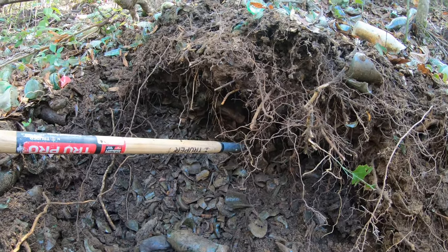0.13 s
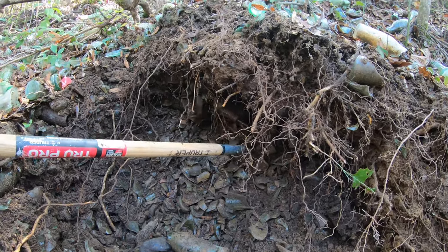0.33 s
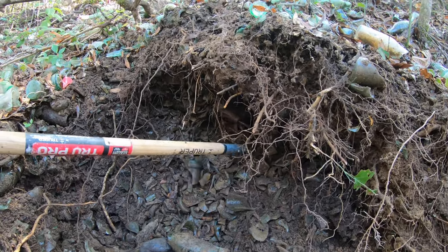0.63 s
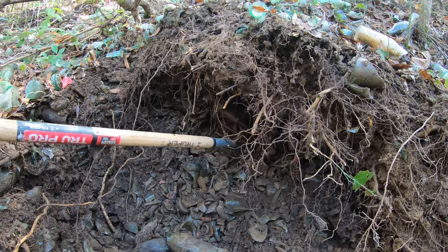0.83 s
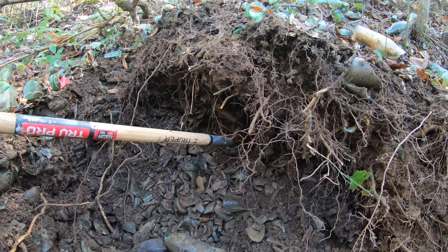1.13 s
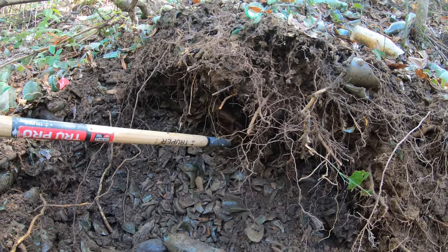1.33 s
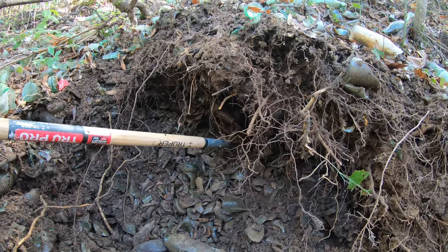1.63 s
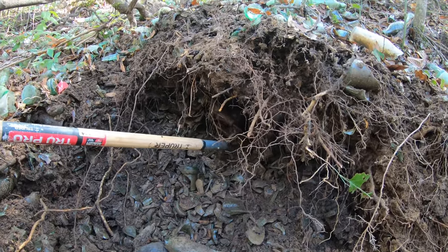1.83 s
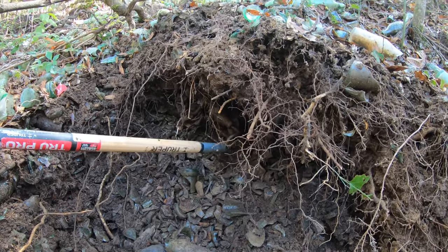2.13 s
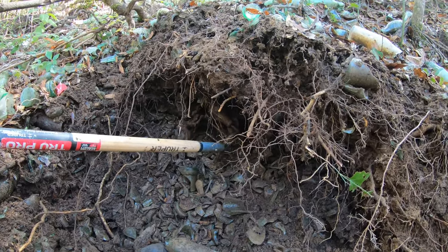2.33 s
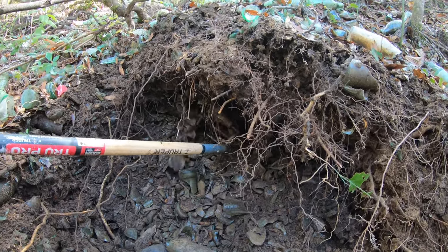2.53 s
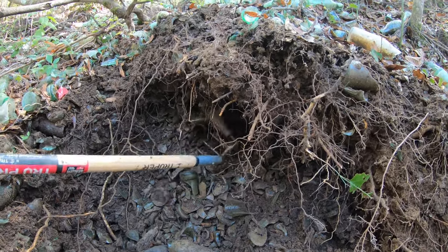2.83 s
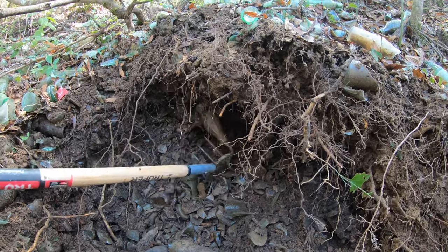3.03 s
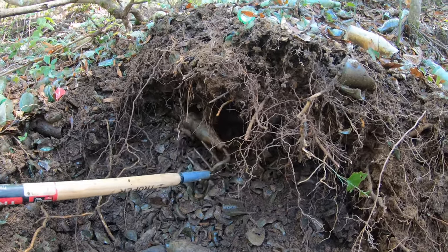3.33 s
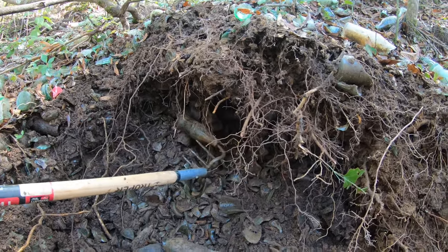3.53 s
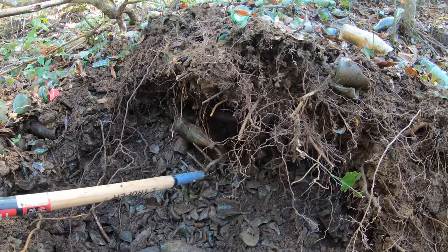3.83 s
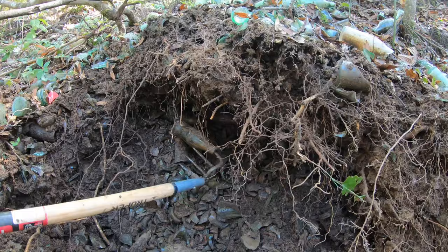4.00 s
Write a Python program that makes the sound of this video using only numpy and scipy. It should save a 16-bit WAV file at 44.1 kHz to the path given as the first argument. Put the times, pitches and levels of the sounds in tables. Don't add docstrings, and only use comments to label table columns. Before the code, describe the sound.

Close up outdoors, a long-handled steel claw works through soil packed with broken glass. Loose grit trickles, then tines bite in short uneven strokes: crunching scrapes, snapping chips, hard clinks and tiny steel pings. Activity is busy in the first second, sparser around one and a half, then dense again from two to four seconds. Dull clod and handle thuds sit underneath, with faint far traffic behind. The stereo camera microphone sounds dry, without echo.

```python
import sys
import numpy as np
from scipy import signal
from scipy.io import wavfile
from scipy.ndimage import uniform_filter1d

SR = 44100
rng = np.random.default_rng(int(sys.argv[2]) if len(sys.argv) > 2 else 0)


def unload_audio(sound):
    columns = np.transpose(np.atleast_2d(sound))
    steps = np.round(np.clip(columns, -1, 1) * 32767)
    wavfile.write(sys.argv[1], SR, steps.astype(np.int16))


def to_linear_factor(level_db):
    exponent = np.asarray(level_db, float) / 20
    return 10 ** exponent


N = 183676


def evened(x):
    return x / np.sqrt(np.mean(x ** 2) + 1e-20)


def read(points, hz):
    f, value = np.transpose(points)
    return np.interp(np.log(hz + 1), np.log(f + 1), value)


def add(mix, s, sound):
    part = mix[round(s * SR):][:len(sound)]
    part += sound[:len(part)]


def band(x, low_hz, high_hz):
    sos = signal.butter(2, [low_hz, min(high_hz, .49 * SR)], "band", fs=SR, output="sos")
    return signal.sosfilt(sos, x)


def wander(per_s):
    sos = signal.butter(1, per_s, fs=SR, output="sos")
    return evened(signal.sosfilt(sos, rng.standard_normal(N)))


def resonate(x, hz, width_hz):
    r = np.exp(-np.pi * width_hz / SR)
    pole = r * np.exp(2j * np.pi * hz / SR)
    return 2 * signal.lfilter([1 - r], [1, -pole], x).real


# f/Hz, level/dB per Hz
AIR_SPECTRUM = [(20, 1), (76, 10.5), (527, -20), (754, -12), (1940, -25.5), (4070, -76), (7000, -55),
                (11000, -58.5), (15000, -46)]
AIR_DB = -45


def air():
    frames, hz = N // 512 + 6, np.fft.rfftfreq(2048, 1 / SR)
    a, b, c, d, patches = rng.standard_normal((frames, 1025, 5)).T
    patches = evened(uniform_filter1d(uniform_filter1d(patches, 5, 0), 8, 1))
    shape = to_linear_factor(read(AIR_SPECTRUM, hz)[:, None] + 3 * patches)
    mid = (a + 1j * b) * shape
    side = to_linear_factor(-9.5) * (c + 1j * d) * shape
    ports = np.array([mid + side, mid - side])
    wash = signal.istft(ports, nperseg=2048, noverlap=1536)[1][:, :N]
    return to_linear_factor(AIR_DB) * evened(wash)


def drone(s, hz, db, waver_hz):
    clock = np.arange(N) / SR
    turns = np.cumsum(np.interp(clock, s, hz) + waver_hz * wander(per_s=7.6)) / SR
    level_db = np.interp(clock, s, db) + 1.94 * wander(per_s=8.76)
    return np.sqrt(2) * to_linear_factor(level_db) * np.sin(2 * np.pi * turns)


# t/s, f/Hz, level/dB rms
ENGINES = [
    [(0, 66, -41), (.45, 67.52, -32), (.9, 68.8, -34.5), (1.15, 73.25, -40), (1.32, 74.5, -35),
     (1.7, 77.87, -44), (2, 77.63, -41.5), (2.1, 79, -59), (2.2, 79.3, -45.5), (2.4, 75.9, -61),
     (2.6, 75.9, -51), (2.9, 76.3, -49.5), (3, 75, -80.5)],
    [(3.25, 56, -69), (3.5, 55.3, -43), (3.8, 55.65, -38.5), (3.92, 57.64, -29.5), (4.16, 58.9, -30)],
]
# t/s, level/dB rms
HUM = [(0, -52.5), (.7, -63), (.9, -44.5), (1.15, -51), (1.45, -80), (1.6, -55), (1.9, -65), (2.1, -50),
       (2.8, -48), (3.6, -69), (3.9, -50.5), (4.16, -55)]
HUM_HZ = 151.6


def far_machines():
    s, db = np.transpose(HUM)
    hum = drone(s, HUM_HZ + 0 * s, db, waver_hz=1.4)
    return hum + sum(drone(*np.transpose(engine), waver_hz=1.0) for engine in ENGINES)


def grains(low_hz, high_hz, cycles, per_s):
    t, layer = np.arange(640) / SR, np.zeros(N)
    size = to_linear_factor(3.1 * np.minimum(rng.exponential(1, N), 3.1)) * (rng.random(N) < per_s / SR)
    size *= rng.choice([-1., 1.], N)
    kind = rng.integers(0, 14, N)
    for k, hz in enumerate(np.geomspace(low_hz, high_hz, num=14)):
        ring = cycles * (.6 + (k % 3) ** 2 / 2)
        decay = np.exp(-t * hz * np.pi / ring) * (1 - t / t[-1])
        grain = np.sin(2 * np.pi * hz * t) * decay * np.sqrt(hz / ring)
        layer += signal.oaconvolve(size * (kind == k), grain)[:N]
    return layer


SNAGS_PER_S, SNAG_S, SNAG_SIZE = 60, .003, .5
CHIP_SNAG = 1.21


def snags():
    size = SNAG_SIZE * np.minimum(rng.exponential(1, N), 2) * (rng.random(N) < SNAGS_PER_S / SR)
    breaks = [*CHIPS_EARLY, *CHIPS_LATE, *TICKS, *CLINKS]
    s, db = np.transpose([row[:2] for row in breaks])
    size[np.round(SR * s).astype(int)] += CHIP_SNAG * to_linear_factor((db + 16.5) / 3)
    pull = signal.lfilter([1], [1, -np.exp(-1 / (SNAG_S * SR))], size)
    return evened(1 + 3 * np.tanh(pull / 3))


# lowest f/Hz, highest f/Hz, ring/cycles, rate/(1/s)
GRAINS = [
    (1555, 4410, 8.7, 2400),
    (4770, 15200, 9.07, 3600),
    (700, 1336, 15, 900),
    (201, 285, 5.5, 440),
]
# t/s, level/dB
TRICKLE = [(0, -39.5), (0.042, -61), (.16, -54), (.22, -52), (.55, -42), (.75, -69), (1.25, -48),
           (1.42, -61.5), (1.549, -56.5), (1.63, -65.5), (1.73, -60), (1.8, -55), (2.4, -56.5),
           (3.101, -51), (3.32, -50.5), (3.9, -59.5), (4.16, -65)]
# start t/s, length/s, level/dB, singing f/Hz
SLIPS = [(0.068, 0.036, -44.5, 2020), (0.455, 0.034, -39, 1830), (0.939, 0.0066, -38, 6400),
         (0.988, 0.075, -44.5, 2200), (1.09, 0.038, -40, 2610), (1.153, 0.015, -30.5, 1970),
         (1.249, 0.034, -44, 2040), (1.344, 0.017, -51, 3040), (1.649, 0.02, -49, 3860),
         (1.864, 0.0161, -34.5, 1960), (2.566, 0.019, -36.5, 3140), (2.972, 0.026, -36.5, 2880),
         (3.364, 0.0428, -34.5, 3100), (3.524, 0.0292, -49, 4070), (3.564, 0.0323, -50, 4260),
         (4.036, 0.14, -61, 3090), (4.124, 0.0131, -46, 2940)]
# start t/s, length/s, level/dB, singing f/Hz, pebble
# level/dB
SLIPS_OWN_PEBBLES = [(0.236, 0.0548, -37, 2850, -5.5), (0.329, 0.064, -51.5, 1560, 6), (0.482, 0.043, -33, 4560, -15),
                     (0.558, 0.15, -36.5, 3850, -17), (0.773, 0.14, -37, 2460, -10.5), (1.484, .12, -53, 1780, -19),
                     (1.777, 0.1, -46.5, 1940, -10), (1.916, 0.0726, -47, 1700, -4), (2.083, 0.092, -35, 6450, -6),
                     (2.199, 0.103, -41.5, 1923, -5.5), (2.303, 0.093, -48.5, 3960, -8),
                     (2.381, 0.056, -35, 3400, -9.5), (2.468, 0.067, -41, 3660, -27), (2.643, 0.22, -33, 3340, -10),
                     (2.854, 0.073, -66, 3280, 4), (3.006, 0.0965, -42.5, 2740, -5), (3.114, 0.098, -42.5, 7550, -10.5),
                     (3.211, 0.098, -45.5, 2950, -7.5), (3.418, 0.044, -40, 3340, 0.5), (3.601, 0.057, -41, 4460, -3),
                     (3.671, 0.033, -34.5, 4670, -9), (3.704, 0.064, -42, 4940, -31), (3.773, 0.05, -39.5, 3470, -38),
                     (3.832, 0.19, -43.5, 3070, -8)]
SLIP_PEBBLES_DB = -13
GLASS_HZ = 3400
SAND_DB, SAND_DB_PER_OCTAVE = -4.5, 1.5
SAND_DB_PER_S = 1.5
SONG_DB, SONG_WIDTH = -14, .17


def grind():
    chatter_db, catch = 1.5 * wander(per_s=70), snags()
    layers = []
    for kind in GRAINS:
        level_db = chatter_db + 2.0 * wander(per_s=12.3)
        layers.append(evened(grains(*kind) * catch * to_linear_factor(level_db)))
    grit, sand, pebbles, clods = layers
    s, trickle_db = np.transpose(TRICKLE)
    soil = grit + to_linear_factor(-2.0) * sand + to_linear_factor(-15.0) * pebbles
    out = to_linear_factor(np.interp(np.arange(N) / SR, s, trickle_db)) * soil
    for s, length, db, hz, pebble_db in [*SLIPS_OWN_PEBBLES, *[(*row, SLIP_PEBBLES_DB) for row in SLIPS]]:
        sand_db = SAND_DB + SAND_DB_PER_OCTAVE * np.log2(hz / GLASS_HZ)
        sand_db += SAND_DB_PER_S * (s - N / SR / 2)
        start = max(s - length / 2, 0)
        part = slice(round(start * SR), round((start + 2 * length) * SR))
        clock = start + np.arange(len(grit[part])) / SR
        place = 2 * (clock - s) / length - 1
        song = evened(resonate(grit[part] + sand[part], hz, width_hz=SONG_WIDTH * hz))
        crush = to_linear_factor(-3) * grit[part] + to_linear_factor(sand_db) * sand[part]
        crush += to_linear_factor(SONG_DB - .45 * sand_db) * song
        crush += to_linear_factor(pebble_db) * (pebbles[part] + to_linear_factor(-3) * clods[part])
        fall = abs(place) ** np.where(place < 0, 3.5, 2.2)
        out[part] += crush * to_linear_factor(db - 8.85 * fall)
    return out + squeals(grit + sand)


# t/s, peak level/dB, f/Hz
CHIPS_EARLY = [(0.095, -26, 2060), (0.2287, -21, 3740), (0.283, -19, 1857), (0.3007, -28, 5100),
               (0.3372, -22.5, 5910), (0.497, -20, 1900), (0.4372, -21, 3080), (0.47, -33.5, 4630),
               (0.519, -20, 3200), (0.654, -28, 6100), (0.5756, -20, 2150), (0.6027, -27.5, 4310),
               (0.6126, -19, 5990), (0.7041, -28.8, 1900), (0.7231, -23, 3790), (0.681, -24, 6000),
               (0.795, -30, 2564), (0.8191, -32.5, 2450), (0.853, -27, 2400), (0.833, -47, 2300),
               (0.847, -29, 2690), (0.8695, -14.5, 2060), (0.886, -19.5, 1920), (0.9017, -21, 3000),
               (0.9037, -20, 2540), (1.0286, -30.2, 3100), (1.0373, -26, 2020), (1.0907, -27, 2450),
               (1.1024, -27, 1210), (1.117, -23, 2710), (1.1274, -19.5, 2580), (1.1345, -31.3, 2610),
               (1.1644, -20, 3050), (1.3007, -25, 2800), (1.5256, -29, 1910), (1.561, -29, 4100),
               (1.5981, -27.5, 1850), (1.6449, -35.5, 4628), (1.7505, -27, 4300), (1.7636, -29, 2270),
               (1.8382, -27.5, 1690), (1.857, -21, 1972), (1.8983, -34, 2580), (1.869, -28, 6000),
               (1.9264, -28.5, 2980), (1.9315, -28, 4610), (1.964, -27, 5750), (2.0027, -31, 3700),
               (2.0841, -19, 2070), (2.117, -18, 4030), (2.1237, -31, 5880), (2.133, -33, 6610),
               (2.1363, -18, 3100), (2.105, -25, 6600)]
# t/s, peak level/dB, f/Hz
CHIPS_LATE = [(2.484, -21, 6300), (2.2513, -26, 1950), (2.3306, -23, 6000), (2.3539, -26, 6270),
              (2.3924, -24.5, 6930), (2.419, -19, 2020), (2.432, -26, 3150), (2.471, -23.5, 7530),
              (2.5, -22, 3324), (2.503, -31, 2240), (2.5139, -31, 3570), (2.538, -27, 2990),
              (2.5695, -31.5, 2750), (2.497, -19.5, 6600), (2.766, -36, 2010), (2.633, -19, 6100),
              (2.6521, -18.5, 1870), (2.658, -19, 3510), (2.677, -27, 2630), (2.6923, -27, 3680),
              (2.7402, -29, 5000), (2.8209, -17.5, 2100), (2.681, -26, 3000), (2.852, -27, 2280),
              (2.8836, -37, 4010), (2.892, -18, 6540), (2.9333, -23, 4370), (2.9554, -24.5, 3300),
              (2.9754, -21, 2670), (2.988, -21.4, 2794), (3.064, -19, 3290), (3.102, -26.5, 7580),
              (3.1584, -25.1, 2650), (3.162, -27, 3470), (3.2145, -25, 2234), (3.244, -34, 2730),
              (3.2593, -36, 2950), (3.285, -21.5, 2700), (3.256, -26, 9800), (3.377, -15, 2990),
              (3.4906, -25, 4150), (3.5435, -26, 3400), (3.5472, -26, 4260), (3.577, -24, 4390),
              (3.584, -21, 4220), (3.5952, -27, 4400), (3.6094, -28.5, 5230), (3.6447, -32, 5080),
              (3.698, -20.5, 4390), (3.7101, -24, 5900), (3.746, -23, 3630), (3.7775, -31, 3230),
              (3.676, -26, 3200), (3.8964, -23, 3080), (3.9152, -26, 3420), (3.974, -44, 3510),
              (3.9916, -24, 3350), (4.0163, -23.5, 3540), (4.0583, -33.5, 2940), (4.088, -32.5, 3400)]
CHIP_CYCLES, CHIP_CLICK_DB, CHIP_DB = 10.3, -3.5, -4.5


def chips():
    out, t = np.zeros(N), np.arange(512) / SR
    click = band(1. * (t == 0), 1500, 7700)
    click = click / abs(click).max()
    for s, db, hz in [*CHIPS_EARLY, *CHIPS_LATE]:
        ring = np.sin(2 * np.pi * hz * t) * np.exp(-t * hz * np.pi / CHIP_CYCLES)
        add(out, s, to_linear_factor(db + CHIP_DB) * (ring + to_linear_factor(CHIP_CLICK_DB) * click))
    return out


# t/s, peak level/dB, f/Hz
TICKS = [(0.143, -23.5, 2860), (0.173, -17.5, 4050), (0.1996, -14, 3420), (0.333, -20.5, 2690),
         (0.4112, -15.5, 2400), (0.43, -13.5, 3300), (0.526, -15, 4400), (1.216, -14.5, 2700),
         (4.16, -17, 3164), (1.3215, -17.5, 3520), (1.569, -21.5, 3980), (1.6862, -22.5, 3500),
         (1.7407, -23, 4300), (1.9517, -20.5, 2500), (2.043, -21.5, 3350), (2.1647, -14.5, 2920),
         (2.358, -17, 3352), (2.4922, -15, 4320), (2.9006, -16.5, 5700), (3.0252, -16, 2900),
         (3.129, -13, 3720), (3.1969, -18.5, 4830), (3.331, -19.5, 5460), (3.5548, -16, 2660),
         (3.617, -20, 2900), (3.728, -9.5, 3400), (3.8491, -15.5, 4000), (3.881, -27, 3090),
         (3.9434, -17.5, 3900), (4.13, -40, 3400)]
# t/s, ring level/dB, ring f/Hz, T60/s
PINGS = [(0.1727, -32.5, 7460, 0.036), (0.411, -46, 7400, .036), (0.6876, -21, 7434, 0.035),
         (.7601, -40, 7300, 0.036), (2.621, -25.5, 7640, .012), (2.973, -31.5, 7550, 0.034),
         (3.059, -35, 7550, .04), (3.098, -18, 7530, 0.041), (3.136, -16.5, 7585, 0.0423),
         (3.1395, -37, 7750, .015), (3.8043, -18, 7500, 0.017), (3.942, -33, 7430, 0.024)]
# t/s, peak level/dB, f/Hz, ring level re peak/dB
BLOWS = [(0.374, -16.5, 3200, -8), (0.4327, -12.5, 4700, -21), (.4893, -8, 4500, -3.5),
         (.5549, -9, 2480, -15.5), (.5718, -0.5, 3530, -16), (.582, -14.5, 4640, -20),
         (0.626, -4.5, 6200, -1.5), (0.646, -15, 6130, 1.5), (.719, -11.5, 4800, -26),
         (0.9355, -10.5, 5350, -33), (0.9392, -10, 5500, -30), (1.1484, -9, 2210, -6),
         (1.1585, -4, 4200, -13), (1.2273, -17, 3400, -7.5), (2.2229, -14, 2380, 0.5),
         (2.3995, -11, 3400, -14), (2.428, -10, 2830, -20), (2.4789, -6.5, 4600, -35.5),
         (2.585, -4, 4240, -7), (2.6194, -10.5, 2730, -32.5), (2.672, -13.5, 2665, -26),
         (2.834, -4.5, 3656, -0.5), (2.952, -7.5, 3550, 0), (3.0596, -8.5, 3810, -9),
         (3.099, -1.5, 3790, -28), (3.429, -13, 4900, -32), (3.4464, -12, 2290, 2), (3.58, -4.5, 3600, 1.5),
         (3.6826, -10, 4400, -15), (3.733, -4.5, 3610, -33)]
# t/s, ring level/dB, ring f/Hz, T60/s
CLINKS = [(0.434, -22, 3150, 0.02), (0.593, -21, 3960, .012), (.631, -19.5, 2430, 0.0089),
          (0.6677, -9, 3605, 0.035), (0.6798, -15.5, 3510, 0.018), (0.855, -26, 2650, 0.035),
          (1.009, -26.5, 1986, 0.014), (1.4926, -27.5, 5450, 0.00202), (1.5083, -26, 1060, 0.0066),
          (1.798, -33.5, 1210, 0.015), (1.8169, -25.5, 1970, 0.013), (1.8312, -25, 1220, 0.0089),
          (1.846, -20.5, 3280, 0.0074), (1.8722, -17.5, 1928, 0.022), (2.0769, -15.5, 2090, 0.00466),
          (2.244, -21.5, 990, 0.0106), (2.715, -17, 5146, 0.0077), (2.782, -14, 2060, 0.012),
          (2.9851, -16, 2840, 0.014), (3.087, -24, 2080, 0.0215), (3.118, -17.5, 3050, 0.0092),
          (3.1235, -17, 3780, 0.0054), (3.367, -16.5, 2906, 0.011), (3.3815, -33, 1920, .03),
          (3.4774, -11.5, 3104, 0.00386), (3.626, -18.5, 2920, 0.0048), (3.641, -21, 5150, 0.014),
          (3.6721, -16, 3380, 0.0054), (4.0028, -26.5, 3860, 0.0074), (4.0127, -27, 3665, 0.0093)]
BLOW_T60, TICK_T60 = 0.00498, 0.0031
TICK_RING_DB, CLINK_RING_DB, PING_RING_DB = -13, 1, -12
GLASS_PULL = 0.48


def strike_rows():
    rows = [(s, db, hz, hz, ring_db, BLOW_T60) for s, db, hz, ring_db in BLOWS]
    rows += [(s, db, hz, hz, TICK_RING_DB, TICK_T60) for s, db, hz in TICKS]
    for s, db, hz, t60 in CLINKS:
        crack_hz = hz * (GLASS_HZ / hz) ** GLASS_PULL
        rows.append((s, db - CLINK_RING_DB, crack_hz, hz, CLINK_RING_DB, t60))
    for s, db, hz, t60 in PINGS:
        rows.append((s, db - PING_RING_DB, 1.5 * hz, hz, PING_RING_DB, t60))
    return rows


def strikes():
    out, t = np.zeros(N), np.arange(3072) / SR
    for s, db, crack_hz, ring_hz, ring_db, t60 in strike_rows():
        noise = rng.standard_normal(len(t))
        snap = (noise + 8.8 * (t == 0)) * to_linear_factor(-60 * t / 0.014)
        crack = band(snap, crack_hz / 2.0, crack_hz * 1.662)
        crack = crack + to_linear_factor(-15.0) * band(snap, 1120, 10300)
        crumbs = to_linear_factor(-14) * noise * to_linear_factor(-60 * t / 0.015)
        crack = crack / abs(crack).max() + crumbs
        envelope = to_linear_factor(-60 * t / max(t60, .002)) * (1 - np.exp(-t / 0.000093))
        ring = np.sin(2 * np.pi * ring_hz * t) * envelope
        add(out, s, to_linear_factor(db - 5.0) * (crack + to_linear_factor(ring_db + 4.0) * ring))
    return out


# start t/s, length/s, level/dB, f/Hz, bandwidth/Hz
SQUEALS = [(0.255, 0.026, -34, 1870, 250), (0.461, 0.074, -34.5, 1840, 240),
           (0.773, 0.13, -37.5, 2473, 610), (0.978, .016, -46.5, 5640, 2500),
           (1.006, 0.0295, -45.5, 1984, 300), (1.114, 0.034, -44, 2800, 350),
           (2.098, 0.069, -43, 6600, 800), (2.13, 0.03, -39, 4450, 500), (2.254, 0.0294, -43, 1954, 250),
           (2.385, 0.034, -44, 6900, 600), (2.654, 0.0544, -37.5, 2550, 497),
           (3.247, 0.033, -39.5, 9660, 700)]


def squeals(grit):
    out = np.zeros(N)
    for s, length, db, hz, width_hz in SQUEALS:
        rub = grit[round(s * SR):][:round(length * SR)]
        tone = evened(resonate(resonate(rub, hz, width_hz), hz, 2 * width_hz))
        add(out, s, to_linear_factor(db) * tone * np.sqrt(np.hanning(len(rub))))
    return out


# t/s, peak level/dB, f/Hz
KNOCKS = [(0.373, -25, 1030), (0.396, -27, 794), (0.553, -28.5, 1120), (0.569, -40, 1160),
          (0.887, -31, 705), (0.948, -33.5, 1010), (1.215, -52, 1140), (1.947, -42, 910), (2.62, -36, 1153),
          (2.707, -34, 1160), (2.986, -34, 1060), (3.444, -27, 1260)]
KNOCK_T60 = 0.012
STRUCK_S = [.373, 1.1587, 2.122, 2.14, 2.241, 2.255, 2.782, 2.8336, 2.9523, 3.0985, 3.4464, 3.5803, 3.733]
# peak level/dB, f/Hz, T60/s
STRUCK_MODES = [
    [(-27, 7300, 0.0134)],
    [(-13.5, 9620, .011), (-17, 11400, 0.0057)],
    [(-30, 920, 0.026)],
    [(-30, 218, 0.0905)],
    [(-26, 6680, .006)],
    [(-35.5, 310, 0.053)],
    [(-31, 3000, 0.00787), (-39, 3750, .009)],
    [(-17.5, 1930, 0.0087), (-41, 4320, 0.017)],
    [(-9, 9057, 0.017), (-19.5, 4900, 0.0104), (-22, 4350, 0.019), (-19.5, 3270, 0.0167),
     (-21, 6570, 0.0046)],
    [(-13.5, 3050, 0.0108), (-15.5, 2290, 0.013), (-37, 13600, 0.026), (-18, 4700, .006)],
    [(-30.5, 3940, 0.0077), (-27, 1400, 0.0069)],
    [(-23.5, 4170, 0.051), (-20.5, 9100, 0.0045), (-18.5, 2840, 0.015), (-35, 2700, 0.012),
     (-40.5, 6500, 0.015)],
    [(-16, 1970, 0.0167), (-22.5, 1520, 0.022), (-24.5, 2700, .012), (-22, 5025, 0.011), (-34, 5150, .012),
     (-27, 7600, .007), (-28, 907, 0.028)],
]
# t/s, peak level/dB, f/Hz, T60/s
THUDS = [(0.491, -28.5, 263, 0.046), (0.555, -25, 261, 0.022), (1.508, -40.5, 183, 0.097),
         (1.815, -30, 219, 0.051), (1.832, -29.5, 370, 0.0235), (1.847, -26, 330, 0.0245),
         (1.876, -30, 330, 0.0335), (2.619, -31, 268, 0.04), (2.076, -29, 305.8, 0.057),
         (2.121, -29, 319, 0.071), (2.421, -33.5, 222, 0.092), (2.779, -31, 228, 0.224),
         (2.998, -35.5, 185.5, 0.14), (3.446, -32, 232.3, 0.31), (3.687, -40, 248, 0.206),
         (2.782, -12.5, 1030, 0.0164), (2.973, -24.5, 1102, 0.082), (3.059, -27.5, 1093, 0.053),
         (3.086, -35, 715, 0.094), (3.58, -22.5, 1120, 0.0266), (3.731, -19, 1129, 0.0436)]


def thuds():
    out, t = np.zeros(N), np.arange(8192) / SR
    rows = [*THUDS, *[(*row, KNOCK_T60) for row in KNOCKS]]
    for s, modes in zip(STRUCK_S, STRUCK_MODES):
        rows += [(s, *mode) for mode in modes]
    for s, db, hz, t60 in rows:
        envelope = to_linear_factor(db - 60 * t / max(t60, .004)) * (1 - np.exp(-t * hz / 0.19))
        add(out, s, envelope * np.sin(2 * np.pi * hz * t))
    return out


# f/Hz, bandwidth/Hz, level/dB
TINES = [
    (1120, 100, -5),
    (7550, 1200, -9.5),
]
# f/Hz, likeness from 0 to 1
SAME = [(60, .97), (350, .94), (1000, .84), (3800, .98), (7000, .65), (8300, .52), (9500, .5), (14000, .55)]
# f/Hz, level/dB
LEAN = [(60, -.5), (1500, .8), (7000, 0), (8200, -3), (10700, -4), (13000, -1.7)]
# f/Hz, phase/rad
PORTS = [(7700, 0), (8800, 1.6), (10300, 0)]


def scene():
    dig = strikes() + grind() + chips()
    steel = sum(to_linear_factor(db) * resonate(dig, hz, width) for hz, width, db in TINES)
    dig = dig + steel + thuds()
    hz, t, z = signal.stft(dig + far_machines(), SR, nperseg=128)
    drift = uniform_filter1d(rng.standard_normal(z.shape[::-1]).T, size=4, axis=0)
    turn = evened(uniform_filter1d(drift, size=24, axis=1))
    turn *= 1.3 * np.sqrt(-2 * np.log(read(SAME, hz)))[:, None] / 2
    turn -= read(PORTS, hz)[:, None] / 2
    lean = to_linear_factor(read(LEAN, hz) / 2)[:, None]
    ports = np.array([z * lean * np.exp(1j * turn), z / lean * np.exp(-1j * turn)])
    return air() + signal.istft(ports, SR, nperseg=128)[1][:, :N]


def low_pass(x):
    return signal.sosfilt(signal.butter(12, 16480, fs=SR, output="sos"), x)


# f/Hz, level/dB
CAMERA = [(1000, -5), (3500, 0.5), (6500, 1), (8500, -3.5), (10000, -1), (11500, -11.5), (14000, -14.5),
          (16200, -32), (16800, -70)]


def record(dry):
    hz = np.linspace(0, SR / 2, num=129)
    colour = signal.firwin2(255, hz, to_linear_factor(read(CAMERA, hz)), fs=SR)
    mix = signal.oaconvolve(dry, colour[None], "same")
    return low_pass(mix)


dry = scene()
out = record(dry)
unload_audio(out)
```